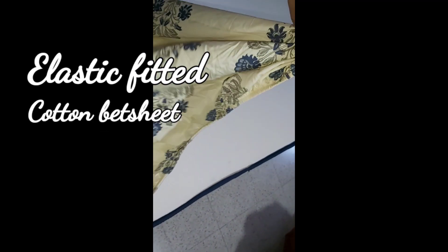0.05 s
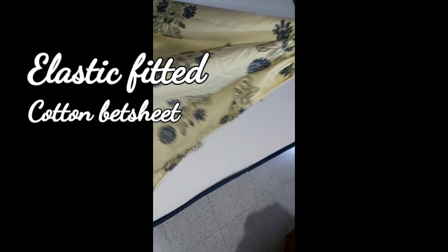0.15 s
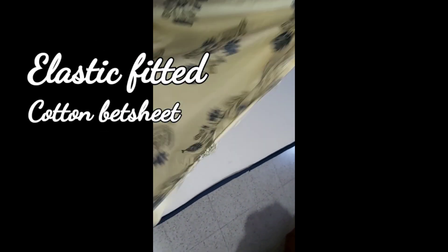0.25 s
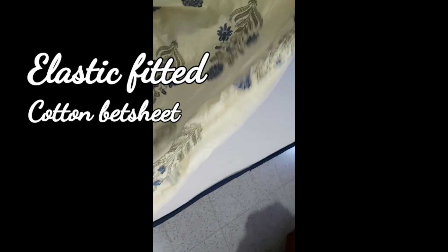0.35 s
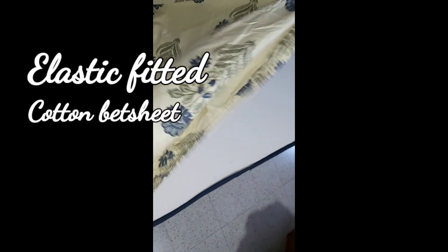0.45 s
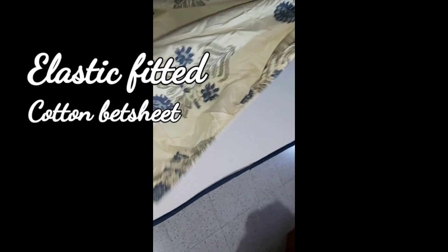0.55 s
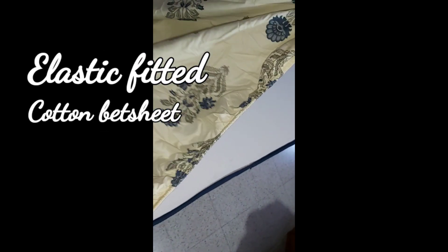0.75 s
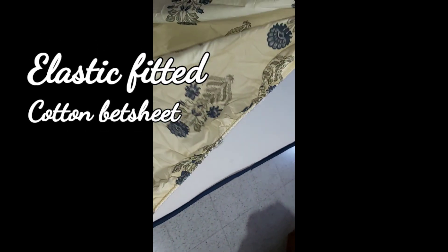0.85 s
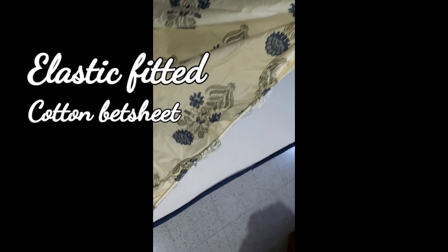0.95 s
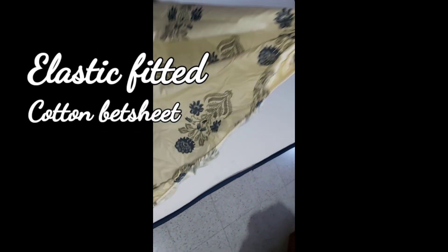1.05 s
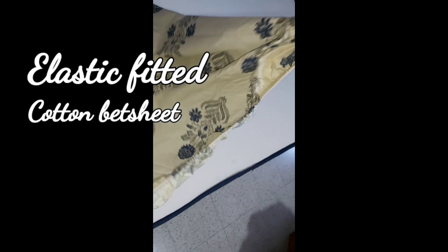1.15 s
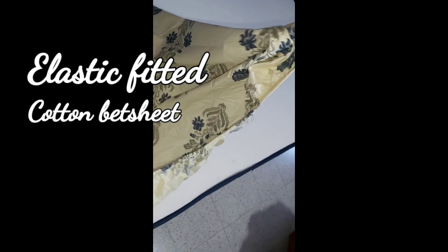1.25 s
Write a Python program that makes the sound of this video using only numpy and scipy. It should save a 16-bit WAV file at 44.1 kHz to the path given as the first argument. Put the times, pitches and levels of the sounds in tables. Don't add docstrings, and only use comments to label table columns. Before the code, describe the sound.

A cotton sheet is pulled tight over a mattress, close up in a small quiet room. Faint hiss and low hum open it. Light bumps come at 0.3 s and firmer ones at 0.35 to 0.38, then the strongest soft thump at 0.44 with crisp crease snaps and dull rubbing. It dies by 0.55, leaving faint padding groans, a thin cricket-like trill and room tone until 1.3 s.

```python
import sys
import numpy as np
from scipy import signal
from scipy.fft import rfft, irfft
from scipy.io import wavfile
from scipy.ndimage import uniform_filter1d

SR = 44100
rng = np.random.default_rng(int(sys.argv[2]) if len(sys.argv) > 2 else 0)


def natural_amplitude(level_db):
    exponent = np.asarray(level_db, float) / 20
    return 10 ** exponent


def file_out(sig):
    cols = np.atleast_2d(sig).T
    lim = np.clip(cols, -1, 1)
    pcm = np.round(lim * 32767).astype(np.int16)
    wavfile.write(sys.argv[1], SR, pcm)


N = 57330

# (frequency [Hz], level [dB per Hz])
RUMBLE_COLOUR = [(15, -37), (25, 10.5), (151, 18), (395, -23.5), (467, -4), (560, -12.5), (700, -6),
                 (910, -16), (1540, -120)]
# (frequency [Hz], level [dB per Hz])
AIR_COLOUR = [(290, -38), (500, -10), (1390, 4.5), (1680, -9), (3520, -20.5), (4560, -13.5), (6090, -53),
              (7780, -36), (15800, -20.5)]
RUMBLE_DB, AIR_DB = -60, -69.5
# (frequency [Hz], width [Hz], level [dB])
ROOM_MODES = [(276.3, 9.6, -79.5), (1490, 180, -74)]
# (frequency [Hz], level [dB])
WHITE = [(20, 0), (20000, 0)]
# (frequency [Hz], side minus mid [dB])
SIDE_OVER_MID = [(60, -21), (110, -31), (200, -7), (380, -7), (700, -1.5), (1290, 0), (2380, -0.5),
                 (4400, -1), (8120, 0.5), (15000, -0.5)]
# (frequency [Hz], left minus right [dB])
LEFT_OVER_RIGHT = [(60, -7.5), (110, -2), (200, -6), (380, -5.5), (700, -11), (1290, -4.5), (2380, -17),
                   (4400, 2), (8120, -7), (15000, 1)]

# (time [s], level [dB])
CRICKET_LEVEL = [(0.0, -72), (0.404, -69.5), (0.422, -64), (0.568, -71.5), (0.77, -70), (0.9, -84),
                 (1.036, -77), (1.046, -85), (1.3, -88)]
CRICKET_HZ, CRICKET_WIDTH_HZ, CRICKET_TRIM_DB, CRICKET_PAN_DB = 4560, 300, -4, 6.5
CHIRPS_PER_S, CHIRP_DEPTH_DB = 14, 2

# (time [s], pitch [Hz], level [dB])
FRAME_HUM = [(0.0, 66.4, -50), (0.028, 63.4, -60), (0.22, 64.6, -47.5), (0.412, 63.2, -46),
             (0.452, 65.7, -41), (0.48, 69.2, -50), (0.532, 65, -53.5), (0.618, 68.4, -47),
             (0.69, 72.9, -60.5), (0.698, 74.6, -71), (0.778, 73.25, -48), (0.832, 65.5, -83),
             (1.068, 68.6, -77), (1.144, 63.64, -50), (1.176, 70.2, -56.5), (1.19, 72, -73),
             (1.252, 69, -55.5), (1.3, 64.5, -55)]
FRAME_PAN_DB, FRAME_ROUGH_DB = -5.5, 1.6

# (peak time [s], half length [s], pitch [Hz], glide [Hz per s], level [dB])
GROANS = [(0.617, 0.09, 280, 3, -62.5), (0.8024, 0.062, 337, 3, -59.5), (1.07, 0.024, 335, -1.5, -61),
          (0.65, 0.0071, 160, -600, -53), (0.878, 0.018, 230, 10, -69), (0.755, 0.041, 77, -1, -50),
          (0.519, 0.015, 290, -200, -47.5), (0.32, 0.031, 116, 1, -48), (1.36, 0.15, 180, 0.5, -60.5),
          (0.11, 0.012, 250, 2, -57), (0.29, 0.0091, 270, -11, -76), (0.25, 0.12, 340, 1, -64),
          (.65, .018, 172, -100, -60), (.427, .009, 115, 1, -46), (1.2, 0.013, 170, 100, -63),
          (.91, 0.0091, 65, 3, -59)]
GROAN_WANDER, GROAN_FLUTTER_DB, GROAN_PAN_DB = 0.0174, 1.5, -5.5
THUD_S, THUD_DB, THUD_HZ, THUD_T60_S, THUD_RISE_S = 0.4478, -29.5, 112, 0.07, 0.002

# (time [s], level [dB])
SLIDE_LEVEL = [(0.0, -69), (0.086, -74), (0.238, -83.5), (0.332, -63.5), (0.382, -66.5), (0.444, -57.5),
               (0.556, -73.5), (0.644, -78.5), (0.814, -76.5), (0.86, -82.5), (1.02, -82), (1.172, -69),
               (1.3, -68.5)]
# (frequency [Hz], level [dB per Hz])
SLIDE_COLOUR = [(1470, 0.5), (2500, -12.5), (3550, -7.5), (3950, -6), (4470, -6.5), (5050, -12.5),
                (7860, -6.5), (10500, -12.5), (15500, -15)]
SLIDE_GRAINS_PER_S, SLIDE_GRAIN_DB, SLIDE_TRIM_DB = 6000, 2.1, 1.5
# (time [s], level [dB])
PULL_LEVEL = [(0, -57), (.05, -62), (.29, -59), (.305, -53), (.34, -56), (.4, -55), (.418, -44),
              (.434, -47), (.446, -40), (.475, -47), (.5, -48.5), (.56, -56.5), (.7, -60.5), (.85, -64),
              (1.0, -66.5), (1.15, -63), (1.3, -56)]
# (frequency [Hz], level [dB per Hz])
PULL_COLOUR = [(60, -30), (130, -12.5), (300, 4.5), (450, -4.5), (900, -10.5), (1900, -15.5), (3000, -32.5),
               (5000, -40.5)]
PULL_GRAINS_PER_S, PULL_GRAIN_DB = 3000, 1.5
GRAIN_CAP = 4
# (peak time [s], half length [s], centre [Hz], width [Hz], level [dB])
SEAM_WHISTLES = [
    (.0, 0.27, 4076, 400, -64),
    (1.24, 0.06, 3560, 550, -71),
    (1.19, 0.04, 14700, 1500, -75.5),
    (0.05, 0.13, 8030, 2700, -73),
    (1.12, 0.068, 8000, 1800, -80),
    (1.13, .035, 3550, 500, -74),
    (1.23, .03, 10800, 900, -78),
]
SEAM_FLUTTER_DB = 2.0

# (time [s], peak [dB], pitch [Hz], left minus right [dB])
SNAPS = [(.3018, -43, 1050, -4), (.3030, -46, 1800, -4), (.3545, -45, 800, -2), (.3792, -42, 750, -2),
         (.4148, -39, 1300, -4), (.4168, -37, 1900, -6), (.421, -42, 1100, -2), (.4382, -28, 1300, 0),
         (.4395, -30, 1700, -4), (.4437, -35, 1900, -7), (.4468, -38, 1700, -4), (.4505, -39, 1500, -2),
         (.4525, -40, 2000, -4), (.4445, -45, 3400, 0), (.4640, -34, 800, -1), (.4705, -41, 1400, -3),
         (.478, -39, 800, 2), (.485, -44, 900, -2)]
SNAP_CYCLES, SNAP_LAG_MS, SNAP_FUZZ = 1.4, 0.13, 0.4
SNAP_SAMPLES = 512

# (time [s], peak [dB], push length [ms], left minus right [dB])
THUMPS = [(.3542, -25, 1.8, -2), (.3751, -28, 2.0, -2), (.4368, -21, 1.6, 1), (.2996, -36, 1.2, -5),
          (.3024, -37, 1.5, -4), (.3061, -33, 1.8, -4), (.3789, -30, 1.6, -2), (.386, -43, 2.0, -2),
          (.410, -37, 2.2, -2), (.4198, -30, 2.0, -3), (.430, -38, 2.5, 0), (.4335, -33, 1.6, 0),
          (.4403, -31, 1.8, 1), (.4437, -31.5, 1.3, 1), (.4468, -37, 1.8, 0), (.4502, -30, 2.0, -1),
          (.4575, -44, 2.5, -1), (.4648, -36, 1.6, -2), (.4745, -32, 2.0, 0), (.4785, -38, 2.0, 0)]
# (frequency [Hz], level [dB], T60 [s])
MATTRESS_MODES = [(194, -16, 0.03), (286, -3.5, 0.019), (291.8, -24, 0.16), (403, -2, 0.014),
                  (554, -22, 0.08), (810, -13, 0.05)]
THUMP_LAG_MS, MODE_SPREAD_DB, PAD_CUT_HZ = 0.2, 1.2, 125

ECHO_T60_S, ECHO_DELAY_S, ECHO_DB, ECHO_TOP_HZ, ECHO_WARM_HZ = 0.17, 0.004, -17, 2480, 530
BASS_CUT_HZ, TOP_HZ = 33.4, 15720


def curve(rows, col=1):
    rows = np.array(rows, float)
    return np.interp(np.arange(N) / SR, rows[:, 0], rows[:, col])


def over_hz(rows, hz):
    rows = np.array(rows, float)
    return np.interp(np.log(hz + 1), np.log(rows[:, 0]), rows[:, 1])


def unit(x):
    return x / np.sqrt(np.mean(x ** 2))


def walk(rate_hz):
    k = max(int(SR / rate_hz), 2)
    smooth = uniform_filter1d(rng.standard_normal(N), k)
    return unit(uniform_filter1d(smooth, k))


def bell(t, peak_s, half_s):
    return np.exp(-((t - peak_s) / half_s) ** 2 / 2)


def pan(db):
    return natural_amplitude(np.array([[db / 2], [-db / 2]]))


def band(x, hz, width_hz):
    f = np.fft.rfftfreq(x.shape[-1], 1 / SR)
    return irfft(rfft(x) / (1 + ((f - hz) / (width_hz / 2)) ** 4), x.shape[-1])


def ports(colour, grain=1, lean=1):
    f = np.fft.rfftfreq(N, 1 / SR)
    noise = rng.standard_normal((2, N)) * grain
    mid, side = rfft(noise) * natural_amplitude(over_hz(colour, f))
    side = side * natural_amplitude(over_hz(SIDE_OVER_MID, f))
    tilt = natural_amplitude(lean * over_hz(LEFT_OVER_RIGHT, f) / 2)
    pair = irfft(np.array([(mid + side) * tilt, (mid - side) / tilt]), N)
    return pair / np.sqrt(np.mean(pair.mean(0) ** 2))


def grains(rate_per_s, spread_db):
    size = natural_amplitude(spread_db * np.minimum(rng.exponential(size=N), GRAIN_CAP))
    return np.repeat(size, max(int(SR / rate_per_s), 1))[:N]


def room():
    hum = 0
    for hz, width_hz, db in ROOM_MODES:
        hum = hum + unit(band(ports(WHITE), hz, width_hz)) * natural_amplitude(db + 1.5 * walk(6))
    rumble = ports(RUMBLE_COLOUR + [(1400, -55)]) * natural_amplitude(RUMBLE_DB)
    air = ports([(250, -40)] + AIR_COLOUR + [(20000, -68)]) * natural_amplitude(AIR_DB)
    return hum + rumble + air


def cricket():
    chirps = np.cumsum(CHIRPS_PER_S * (1 + 0.15 * walk(2.8))) / SR
    throb_db = CHIRP_DEPTH_DB * np.sin(2 * np.pi * chirps)
    trill = unit(band(rng.standard_normal((2, N)), CRICKET_HZ, CRICKET_WIDTH_HZ))
    return trill * natural_amplitude(curve(CRICKET_LEVEL) + throb_db + CRICKET_TRIM_DB) * pan(CRICKET_PAN_DB)


def frame():
    hz = curve(FRAME_HUM) * (1 + 0.03 * walk(12))
    tone = np.sqrt(2) * np.sin(2 * np.pi * np.cumsum(hz) / SR)
    level_db = curve(FRAME_HUM, col=2) + FRAME_ROUGH_DB * walk(28)
    return tone * natural_amplitude(level_db) * pan(FRAME_PAN_DB)


def groans():
    t, out = np.arange(N) / SR, 0
    for peak_s, half_s, hz, glide, db in GROANS:
        pitch = np.maximum(hz + glide * (t - peak_s), 40) * (1 + GROAN_WANDER * walk(30))
        turns = np.cumsum(pitch) / SR
        tone = np.cos(2 * np.pi * (turns - np.interp(peak_s, t, turns)))
        out = out + tone * bell(t, peak_s, half_s) * natural_amplitude(db + GROAN_FLUTTER_DB * walk(43))
    return out * pan(GROAN_PAN_DB)


def thud():
    since = np.maximum(np.arange(N) / SR - THUD_S, 0)
    envelope = 1000. ** (-since / THUD_T60_S) * (1 - np.exp(-since / THUD_RISE_S))
    tone = -np.sin(2 * np.pi * THUD_HZ * since) * envelope
    return natural_amplitude(THUD_DB) * tone / np.abs(tone).max()


def cloth():
    slips = grains(SLIDE_GRAINS_PER_S, SLIDE_GRAIN_DB)
    hiss = ports(SLIDE_COLOUR, slips, lean=0.94) * natural_amplitude(curve(SLIDE_LEVEL) + SLIDE_TRIM_DB)
    slips = grains(PULL_GRAINS_PER_S, PULL_GRAIN_DB)
    rub = ports(PULL_COLOUR, slips, lean=0.43) * natural_amplitude(curve(PULL_LEVEL))
    t, seams = np.arange(N) / SR, 0
    for peak_s, half_s, hz, width_hz, db in SEAM_WHISTLES:
        whistle = unit(band(ports(WHITE), hz, width_hz))
        seams = seams + whistle * bell(t, peak_s, half_s) * natural_amplitude(db + SEAM_FLUTTER_DB * walk(33))
    return hiss + rub + seams


def snaps():
    out = np.zeros((2, N))
    since = np.arange(SNAP_SAMPLES) / SR - np.array([[0], [SNAP_LAG_MS / 1000]])
    for s, db, hz, lean_db in SNAPS:
        turns = np.maximum(since * hz, 0)
        fuzz = unit(band(rng.standard_normal((2, SNAP_SAMPLES)), hz, hz))
        pop = np.sin(2 * np.pi * turns) + SNAP_FUZZ * fuzz
        pop = pop * np.minimum(4 * turns, 1) * np.exp(-turns / SNAP_CYCLES)
        start = int(s * SR)
        out[:, start:start + SNAP_SAMPLES] += natural_amplitude(db) * pan(lean_db) * pop
    return out


def thumps():
    t, out = np.arange(SR // 3) / SR, np.zeros((2, N + SR))
    lag = int(THUMP_LAG_MS * SR / 1000)
    for s, db, push_ms, lean_db in THUMPS:
        ring = 0
        for hz, mode_db, t60_s in MATTRESS_MODES:
            gain = natural_amplitude(mode_db + MODE_SPREAD_DB * rng.standard_normal())
            ring = ring + gain * np.sin(2 * np.pi * hz * t) * 1000. ** (-t / t60_s)
        push = np.sin(np.pi * np.clip(t[:441] * 1000 / push_ms, 0, 1)) ** 2
        body = -np.convolve(ring, push)[:len(t)]
        pair = np.array([body, np.roll(body, lag)])
        start = int(s * SR)
        out[:, start:start + len(t)] += natural_amplitude(db) * pan(lean_db) * pair / np.abs(body).max()
    pad = signal.butter(2, PAD_CUT_HZ, "high", fs=SR, output="sos")
    return signal.sosfiltfilt(pad, out[:, :N])


def echo(hits):
    t = np.arange(SR // 2) / SR
    decay = 1000. ** (-t / ECHO_T60_S) * (t > ECHO_DELAY_S)
    tail = band(rng.standard_normal((2, len(t))) * decay, 0, 2 * ECHO_TOP_HZ)
    tail = tail + band(tail[::-1], 0, ECHO_WARM_HZ)
    tail = tail / np.sqrt((tail ** 2).sum(1).mean())
    return natural_amplitude(ECHO_DB) * signal.fftconvolve(hits.mean(0)[None], tail, axes=1)[:, :N]


def scene():
    hits = thumps() + snaps()
    return room() + cricket() + frame() + groans() + thud() + cloth() + hits + echo(hits)


def top_cut(x):
    return signal.sosfilt(signal.butter(12, 16200, fs=SR, output="sos"), x)


def record(dry):
    bass_cut = signal.butter(2, BASS_CUT_HZ, "high", fs=SR, output="sos")
    x = signal.sosfilt(bass_cut, dry)
    x = irfft(rfft(x) * (np.fft.rfftfreq(N, 1 / SR) < TOP_HZ), N)
    return top_cut(x)


dry = scene()
out = record(dry)
file_out(out)
```